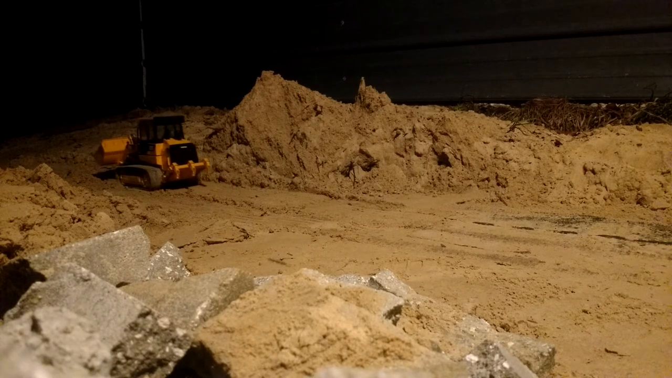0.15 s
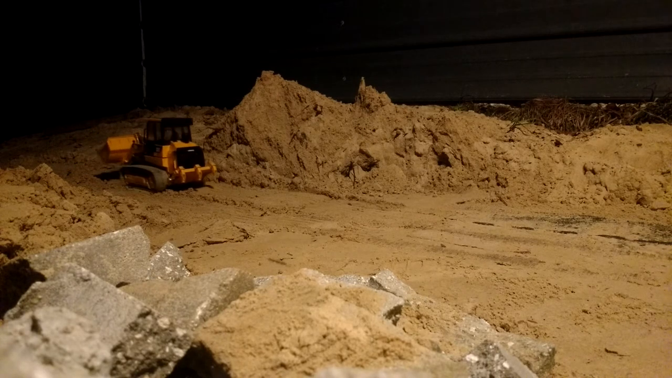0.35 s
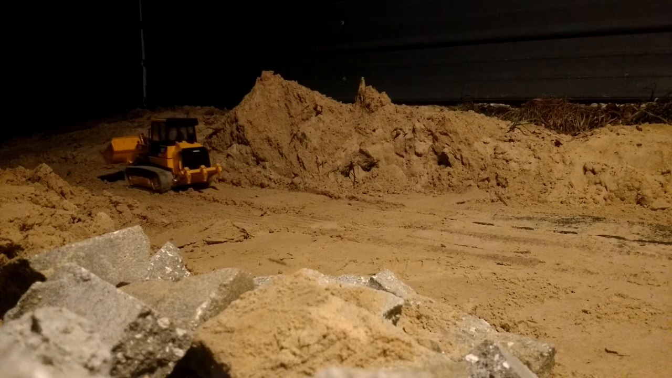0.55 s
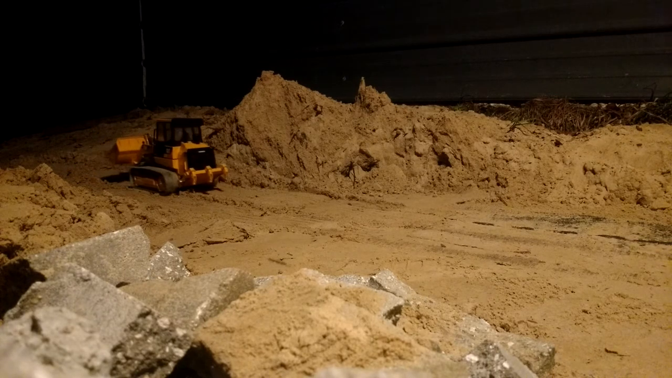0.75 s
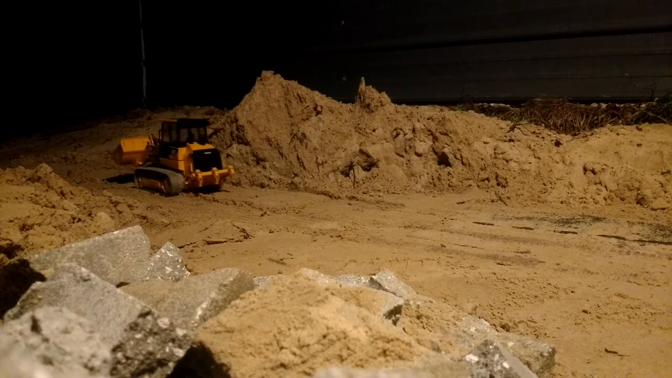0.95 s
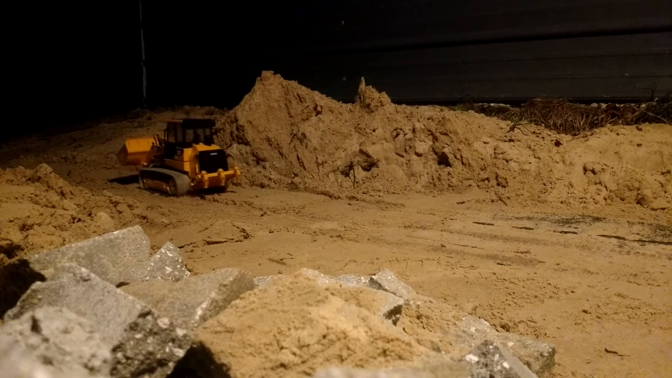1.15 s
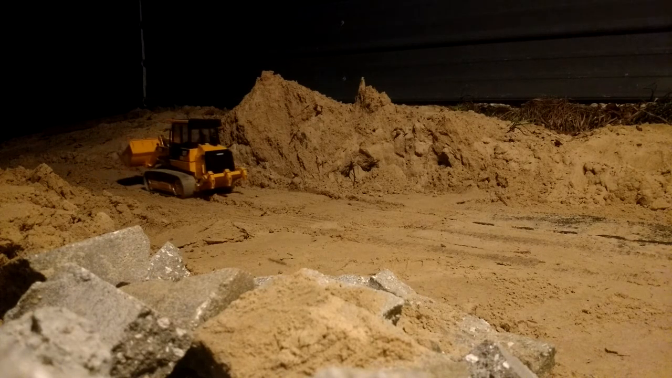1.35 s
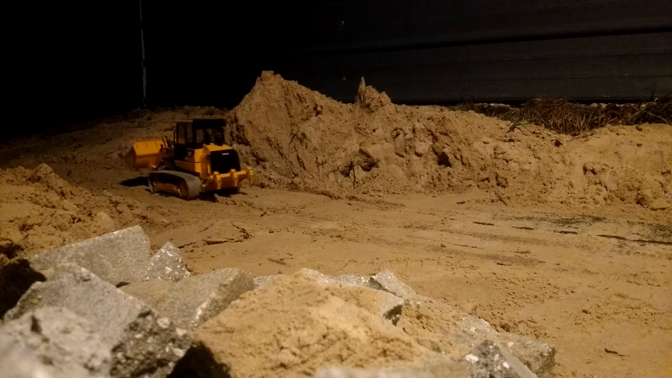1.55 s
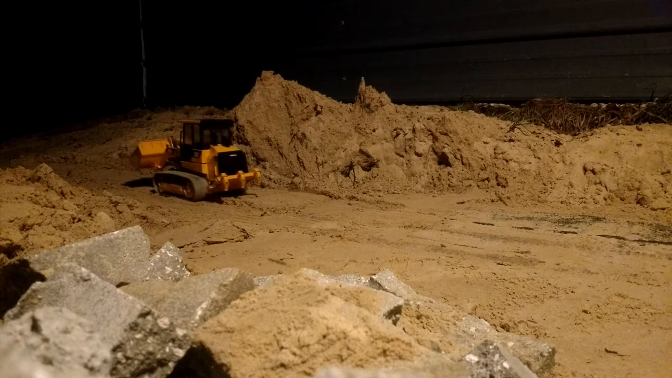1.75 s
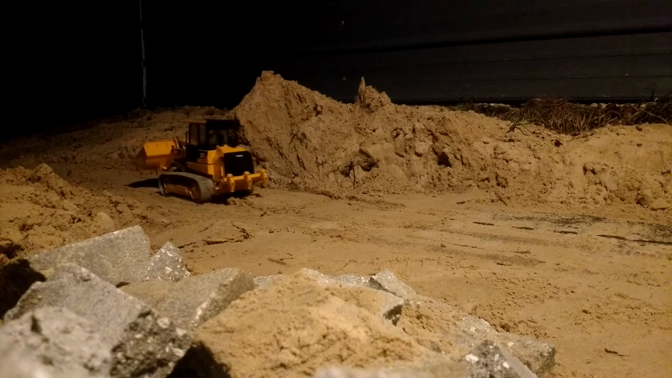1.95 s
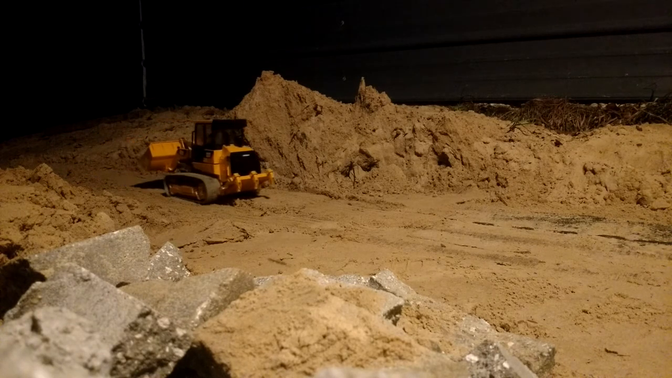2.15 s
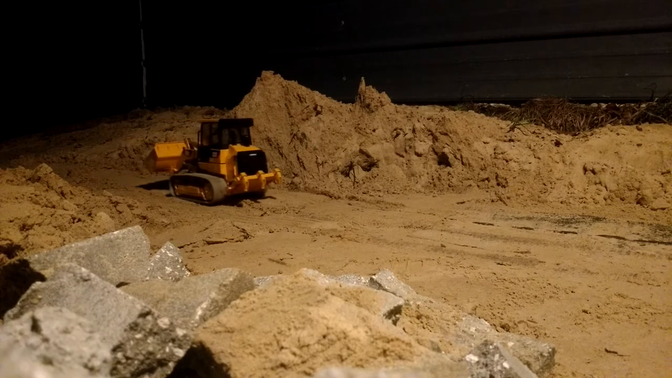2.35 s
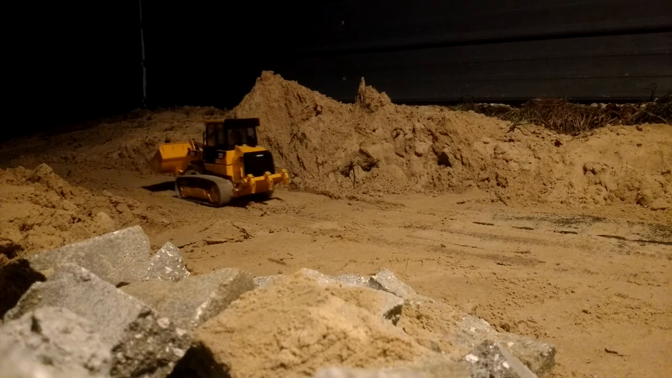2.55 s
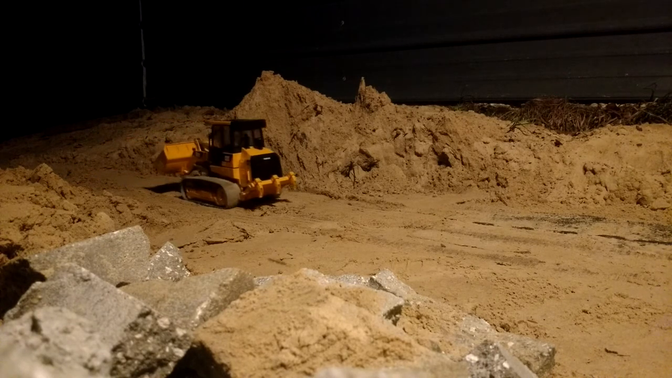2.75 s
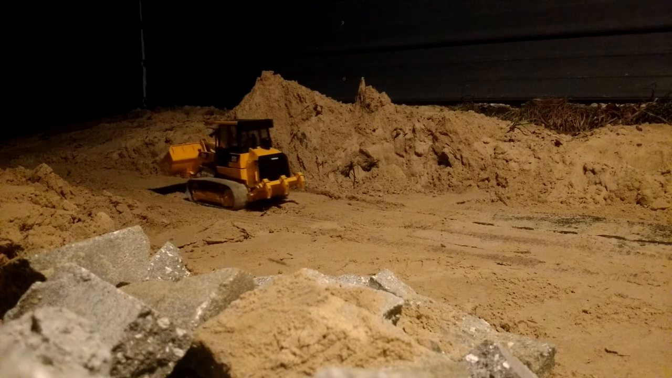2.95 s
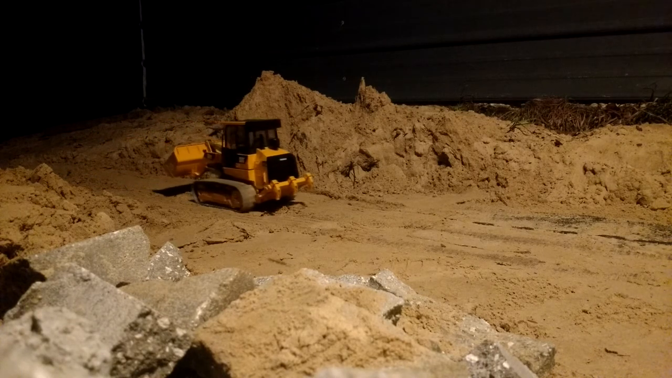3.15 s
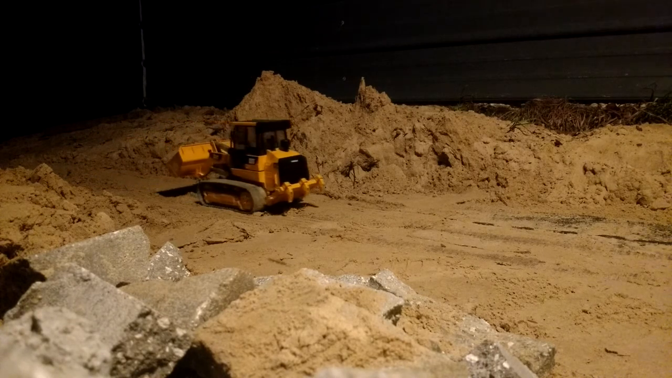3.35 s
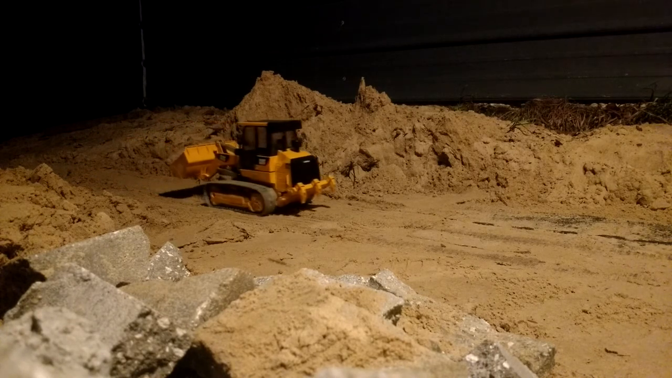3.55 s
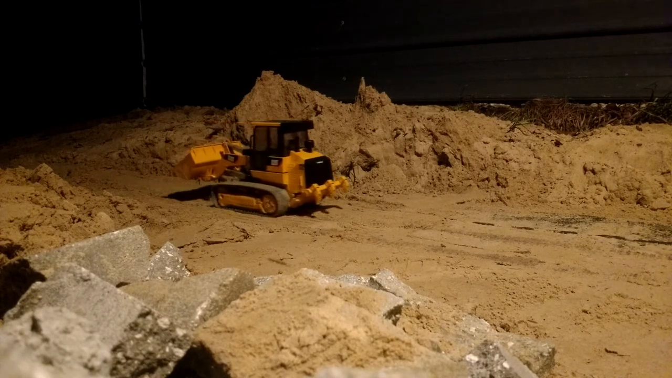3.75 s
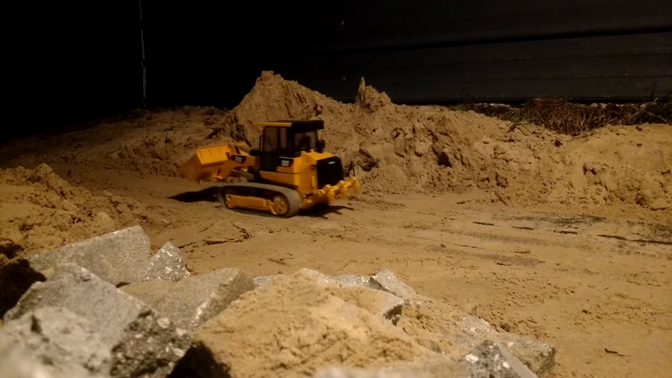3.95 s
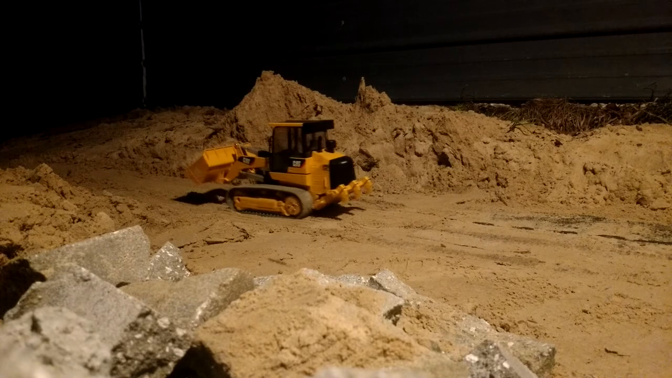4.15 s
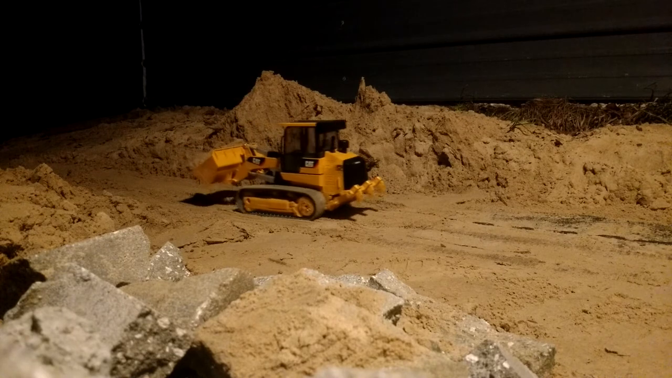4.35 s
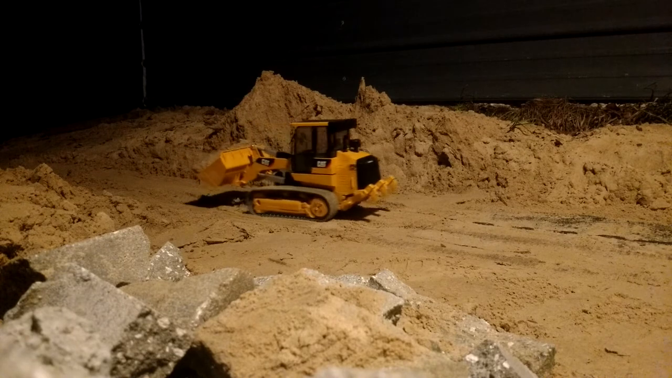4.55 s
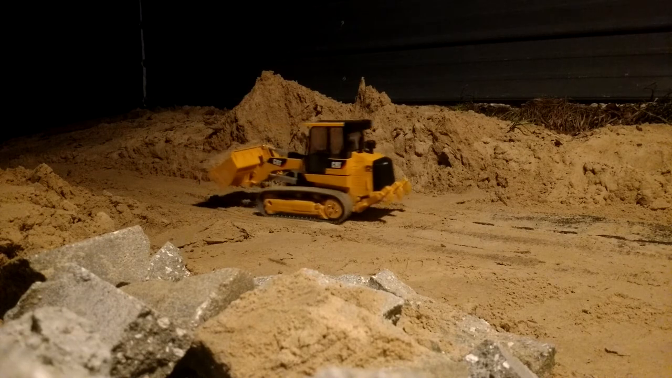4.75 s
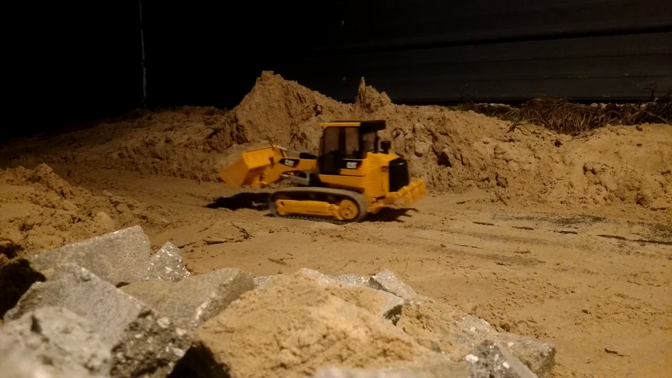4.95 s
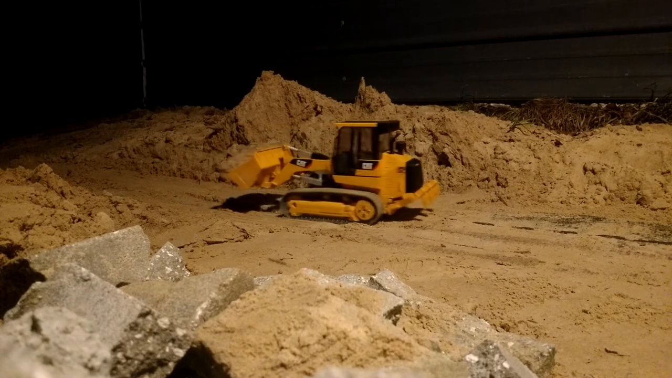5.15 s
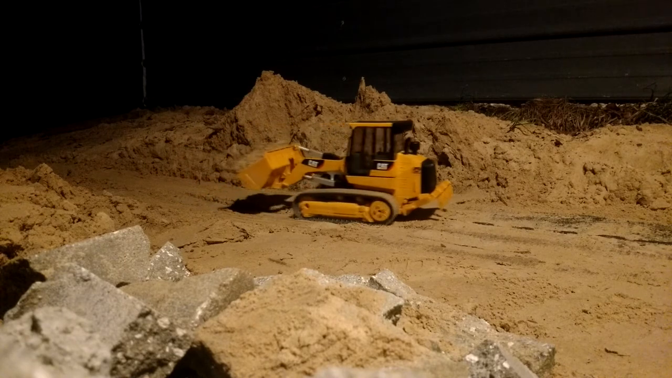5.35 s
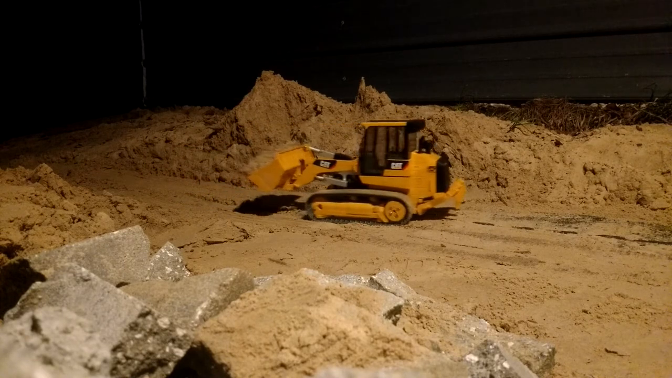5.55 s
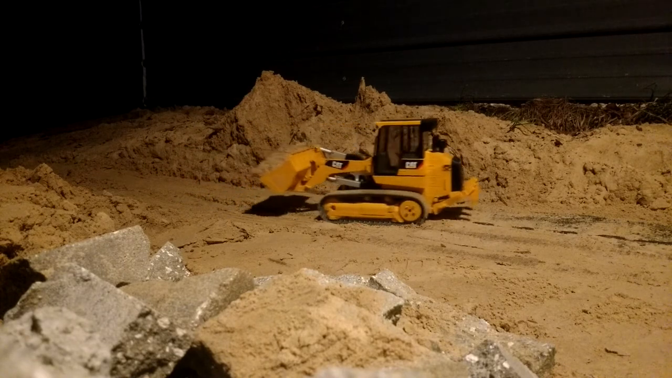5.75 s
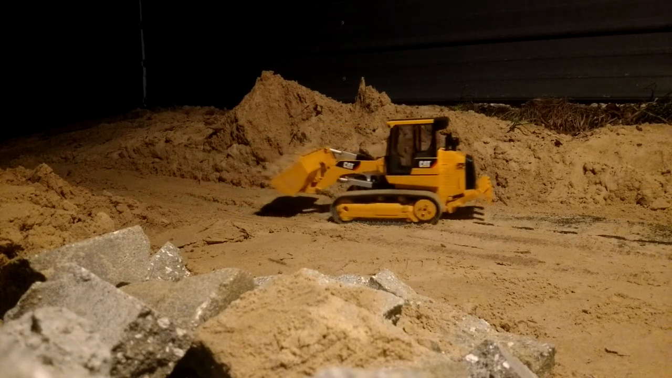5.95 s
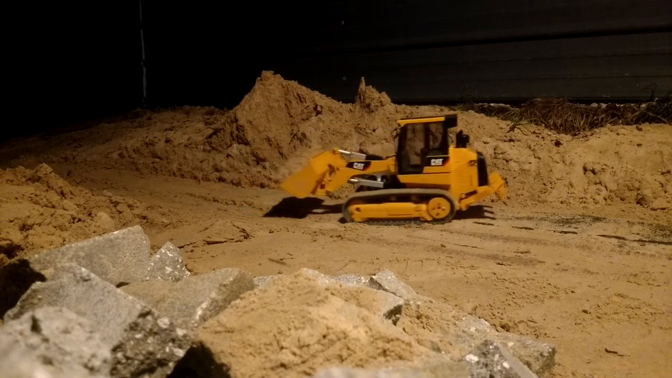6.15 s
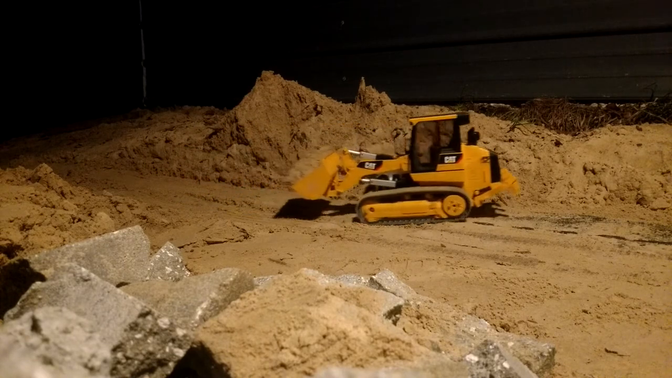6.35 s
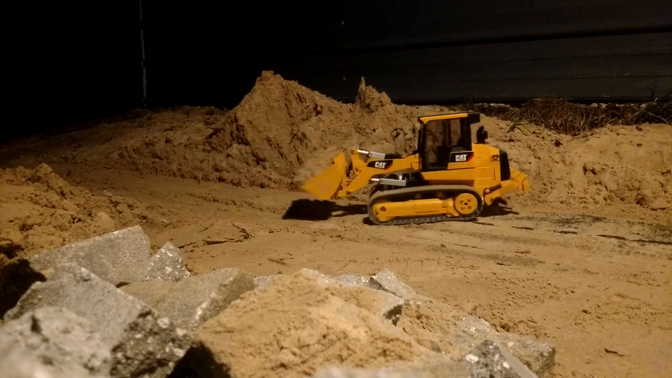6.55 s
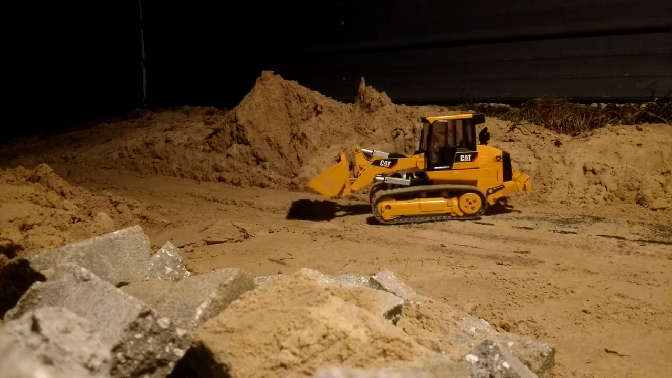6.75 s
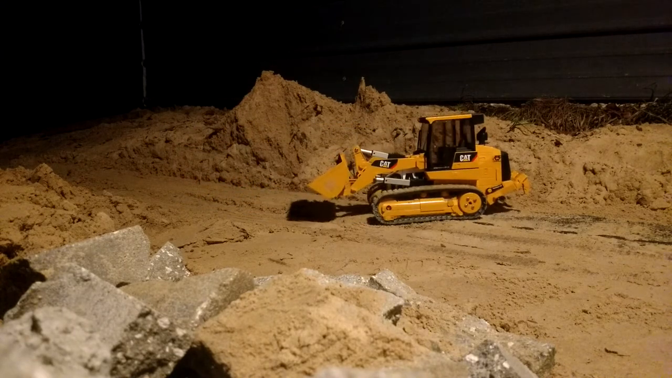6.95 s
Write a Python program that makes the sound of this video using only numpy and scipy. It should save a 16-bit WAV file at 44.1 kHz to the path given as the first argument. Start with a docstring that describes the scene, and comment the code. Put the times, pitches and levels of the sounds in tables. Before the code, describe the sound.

Quiet outdoor night air, with a low distant hum and faint raspy cricket chirps, sits behind a toy-sized tracked loader on sand. From 0 s its two electric drives are already running: high, buzzy, slightly detuned gear whines, each roughened and throbbing rapidly with shaft turns. Track links patter, sand crunches and the hollow hull rumbles, with brief swells between about 1.3 and 2.7 s and a bump near 4 s. It approaches from roughly three metres to under one and a half; tracks grow louder, the near gear brighter and raspier, with tight scraping around 3.5 to 5 s, while the far drive recedes. From 6.07 s light chassis knocks and loose rattles cluster. The whines fall in pitch and fade between 6.3 and 6.8 s, with sparse grit snaps. At 6.85 s the bucket settles with a short hollow, steely clank, leaving near silence and a faint chirp.

```python
"""Night air, a distant hum and a faint cricket lie behind a radio-controlled tracked loader on sand.
It backs in from the far left, about three metres from a microphone pair, and comes nearer and right.
Each track has its own motor: gears whine and rasp once a shaft turn, links patter and sand crunches.
After six seconds the drives run down; chassis and bucket knock, links rattle and grit snaps.
Whines are summed tooth-mesh harmonics, noises are coloured grains, knocks are decaying modes."""
import sys
import numpy as np
from scipy.fft import rfft, irfft, next_fast_len
from scipy.io import wavfile
from scipy.ndimage import uniform_filter1d, map_coordinates

SR = 44100
rng = np.random.default_rng(int(sys.argv[2]) if len(sys.argv) > 2 else 0)


def wav_record(signal):
    """Record a signal, one row per channel, as 16-bit PCM in the file named by sys.argv[1]."""
    frames = np.transpose(np.atleast_2d(signal))
    bounded = np.clip(frames, -1, 1)
    # unit amplitude maps onto the largest positive 16-bit level
    quanta = np.round(bounded * 32767).astype(np.int16)
    wavfile.write(sys.argv[1], SR, quanta)


N = 308700
TIME = np.arange(N) / SR

# teeth of the first gear and of the motor pinion; the two loudest mesh harmonics
TEETH, PINION = 50, 10
SECOND, THIRD = 2, 3
# each drive is throttled back, then runs down to rest: (time [s], run-down [s])
FAST_STOP, SLOW_STOP = (6.277, 0.322), (6.43, 0.4)

# where the loader stands: (time [s], place [0 far left to 1 near and right])
PLACE = [(0, 0.069), (2.3, 0.2), (4.2, 0.53), (5.7, 0.86)]
# links on sand, also the hull's broad resonances: (frequency [Hz], relative density [dB per Hz])
LINKS_ON_SAND = [(150, -18.5), (290, -17), (375, -5), (450, -12), (540, -4), (700, -7.5), (950, 1.5),
                 (1350, 0.5), (1700, -6.5), (2100, -7), (3000, -17), (6000, -19.5)]


def amp(db):
    """Decibels to gain."""
    return 10 ** (np.asarray(db) / 20)


def unit(x):
    """Scale to rms 1."""
    return x / np.sqrt(np.mean(x ** 2) + 1e-20)


def along(points, hz):
    """(Hz, value) points read on a log frequency axis."""
    f, v = np.transpose(points)
    return np.interp(np.log(hz + 1), np.log(f + 1), v)


def curves(rows):
    """One value per sample for each column after the time."""
    s, *cols = np.transpose(rows)
    return [np.interp(TIME, s, c) for c in cols]


def wobble(rate):
    """A smooth random curve at rms 1, rate knots a second."""
    knots = rng.standard_normal(int(TIME[-1] * rate) + 5)
    coarse = TIME[::10]
    curve = map_coordinates(knots, [coarse * rate], order=2, mode="mirror")
    return unit(np.interp(TIME, coarse, curve))


def filtered(x, response):
    """x times a response of frequency."""
    size = next_fast_len(N + 8192)
    return irfft(rfft(x, size) * response(np.fft.rfftfreq(size, 1 / SR)), size)[..., :N]


def coloured(x, spectrum):
    """x shaped by the given spectrum, at rms 1."""
    return unit(filtered(x, lambda hz: amp(along(spectrum, hz))))


def add(track, s, sound):
    """Mix a sound in at time s."""
    part = track[..., round(s * SR):][..., :sound.shape[-1]]
    part += sound[..., :part.shape[-1]]


def grains(rate, spread_db):
    """Two rows of tiny impacts at shared random times, rate a second, with scattered sizes."""
    hit = rng.random(N) < rate / SR
    size = amp(spread_db * np.clip(rng.standard_normal(N), -2, 2))
    return unit(hit * size * rng.standard_normal((2, N)))


def spread(pair):
    """Two unrelated signals become left and right, as alike as the microphone pair hears each pitch."""
    # (frequency [Hz], left-right likeness [-1 to 1])
    likeness = [(60, -0.85), (150, -0.079), (300, 0.36), (550, 0.95), (1300, 1), (1800, 0.95), (2150, 1),
                (2600, 0.62), (3200, 1), (4200, 1), (5000, 0.63), (6400, 1), (8000, 0.41), (11000, 0.45)]
    turn = lambda hz: np.arccos(np.clip(along(likeness, hz), -1, 1)) / 2
    mid, side = filtered(pair, lambda hz: np.array([np.cos(turn(hz)), np.sin(turn(hz))]))
    return np.array([mid + side, mid - side])


def nearness():
    """Level gained by coming closer, in dB over the starting point, by the inverse distance law."""
    # loader to microphone: (time [s], distance [m])
    distance = [(0, 3.2), (2.3, 2.28), (4.3, 1.6), (6.3, 1.414)]
    metres, = curves(distance)
    return 20 * np.log10(metres[0] / metres)


def side_on():
    """How far the loader has turned its side to the microphone, 0-1."""
    return np.clip(2.6 * curves(PLACE)[0], 0, 1)


def coast(stop):
    """Share of its speed that a drive keeps: it slows ever faster once throttled back."""
    off_s, run_down_s = stop
    curve = 2.45  # the higher, the later the speed falls away
    return np.clip(1 - (np.maximum(TIME - off_s, 0) / run_down_s) ** curve, 0, 1)


def rolling():
    """Share of its travelling speed that the whole machine keeps."""
    return (coast(FAST_STOP) + coast(SLOW_STOP)) / 2


def strain(part):
    """Rise in dB of one part as it comes under strain: each strain builds, holds and eases."""
    # gears, tracks, hull or grit: (part, middle [s], length [s], rise [dB before the part's own share])
    strains = [("slow third", 0.25, 0.46, 6.5), ("fast second", 0.099, 0.72, 6.6),
               ("fast second", 0.96, 1.3, 6.6), ("fast second", 2.05, 2, 8.4),
               ("slow second", 1, 0.89, 2.9), ("slow second", 1.72, 0.96, 4.4), ("hull", 1.363, 0.15, 4.4),
               ("hull", 1.67, .25, 4.8), ("hull", 1.92, 0.11, 8.1), ("fast third", 2.5, 0.15, 5.8),
               ("fast drone", 2.476, 0.77, 5.6), ("hull", 2.43, 0.42, 6), ("slow third", 2.76, 0.21, 5),
               ("hull", 2.68, 0.17, 9.8), ("tracks", 2.57, 0.69, 2.4), ("fast second", 2.92, 1.05, 6.8),
               ("slow third", 2.95, .4, 3.8), ("slow drone", 2.93, 0.47, 9.5),
               ("slow drone", 3.464, 0.81, 8.4), ("fast drone", 0.98, 0.65, 4.9),
               ("fast drone", 2.0, 0.46, 5), ("fast second", 3.614, 0.56, 5.16),
               ("fast second", 4.38, 1, 3.1), ("hull", 3.94, 0.17, 10.8), ("bind", 4.14, 0.56, 5),
               ("slow drone", 4.464, 1.33, 16), ("fast third", 4.66, 0.19, 6.6),
               ("bind", 3.565, 0.36, 2.37), ("fast drone", 4.87, 0.29, 7.3),
               ("fast third", 5.23, 0.27, 8.4), ("grit", 5.9, 0.18, 5), ("grit", 6.095, 0.65, 3.05),
               ("bind", 5.1, 0.26, 3.9), ("fast second", 6.015, 0.96, 10.3),
               ("fast overtones", 6.53, 0.23, 2.7), ("grit", 6.34, 0.27, 5.1), ("fast third", 6.3, 0.12, 5),
               ("fast third", 6.415, 0.18, 14), ("fast overtones", 5.92, 0.95, 2.16),
               ("slow third", 6.58, 0.16, 5), ("slow third", 3.796, 1.0, 3.2),
               ("slow third", 1.51, 1.6, 2.3)]
    rise_share = 0.36  # of the length, spent building and again easing
    return sum(db * np.clip((0.5 - abs(TIME - s) / length) / rise_share, 0, 1)
               for name, s, length, db in strains if name == part)


def turn_rate(angle):
    """Turns a second of a shaft."""
    return np.abs(np.gradient(angle)) * SR / (2 * np.pi)


def per_turn(angle, count):
    """Tooth errors: a random pattern of count points that returns each turn and changes only slowly."""
    turns = angle / (2 * np.pi)
    pattern = rng.standard_normal((400, count))
    pattern = uniform_filter1d(pattern, size=14, axis=0, mode="wrap").ravel()
    return unit(np.interp(turns * count, np.arange(pattern.size), pattern))


def night(air_db, hum_db, hum_waver):
    """Outdoor air as coloured noise, and the unsteady hum of distant machinery as wavering tones."""
    # air: (frequency [Hz], relative density [dB per Hz])
    air_spectrum = [(25, -42), (40, -32), (56, 1), (78, -8), (100, -2.5), (160, 4.5), (210, -3),
                    (280, -2.5), (420, -11.5), (570, -11.5), (800, -10.5), (1250, -4), (2000, -19.5),
                    (14000, -29)]
    # distant machinery: (frequency [Hz], relative level [dB])
    hum_tones = [(93, -63), (119, -60), (166, -57), (236, -61.5), (275, -61)]
    air = amp(air_db) * coloured(rng.standard_normal((2, N)), air_spectrum)

    def tone(hz):
        """One hum note, wavering in level and phase."""
        return unit((1 + hum_waver * wobble(14)) * np.sin(2 * np.pi * hz * TIME + 1.6 * wobble(9)))
    # each microphone hears its own wavering
    hum = [sum(amp(db + hum_db) * tone(hz) for hz, db in hum_tones) for port in range(2)]
    return air + np.array(hum)


def cricket(chirp_hz, chirp_db):
    """Faint raspy chirps on one wavering note."""
    # (time [s], length [s], relative level [dB])
    chirps = [(0.346, 0.22, -51), (1.79, 0.2, -52), (2.548, 0.2, -48), (3.8, 0.231, -48),
              (4.957, 0.22, -46), (6.754, 0.195, -47)]
    gate = lambda s, length: np.clip(np.minimum(TIME - s, s + length - TIME) / 0.016, 0, 1)
    level = sum(amp(db + chirp_db) * gate(s, length) for s, length, db in chirps)
    note = np.sin(2 * np.pi * chirp_hz * TIME + 1.04 * wobble(260))
    return level * unit(amp(3.1 * wobble(110)) * note)


def knocks(knock_db, rattle_db, click_db, tick_db):
    """Bucket and chassis jolts ring decaying modes, click and rattle loose links; sand grit snaps."""
    # bucket and chassis: (time [s], relative level [dB], bright click re the knock [dB, before click_db])
    contacts = [(6.073, -25.5, -19), (6.0792, -26, -19), (6.089, -30, -7), (6.097, -28, -15),
                (6.111, -25, -12), (6.127, -34, -12), (6.134, -27, -14), (6.146, -30, -14),
                (6.233, -23.5, -24), (6.252, -24.5, -17), (6.2905, -22, -8), (6.298, -20.5, -15),
                (6.308, -26.5, -15), (6.317, -28, -15), (6.327, -25, -18), (6.344, -22.5, -16),
                (6.369, -28, -18), (6.381, -25, -19), (6.385, -26.5, -16), (6.494, -22.5, -19),
                (6.552, -28, -8), (6.8536, -23, -11.5), (6.8565, -24.5, -13.5), (6.8594, -34, -16),
                (6.989, -32.5, -32)]
    # chassis modes: (nominal frequency [Hz], relative level [dB], t60 [s])
    chassis = [(273.7, -10.5, 0.048), (373, -9, 0.026), (546, -7, 0.05), (721, -6, 0.036),
               (940, -0.5, 0.025), (1167, -2.5, 0.024), (1325, -3.5, 0.024), (1537, -7, 0.022),
               (1719, -9.5, 0.02), (2580, -16, 0.015), (3010, -20, 0.022)]
    # grit snaps under the tracks: (time [s], relative level [dB])
    grit_snaps = [(1.067, -34.5), (1.0913, -35), (4.5405, -35), (4.994, -37), (5.3444, -33), (6.51, -40),
                  (6.686, -51), (6.71, -46), (6.9331, -49), (6.9742, -42)]
    rattle_t60_s = 0.051  # loose links rattle on after each knock
    body, shaken, clicks = np.zeros(N), np.zeros(N), np.zeros((2, N))
    t = np.arange(SR // 8) / SR
    hz, mode_db, t60 = np.transpose(chassis)[:, :, None]
    for s, db, bright_db in contacts:
        # each contact loads the chassis a little differently
        strength, start, detune = rng.standard_normal((3, len(hz), 1))
        decay = amp(mode_db + 1.4 * strength - 60 * t / t60)
        ring = (decay * np.sin(2 * np.pi * (hz * (1 + 0.048 * detune) * t + start))).sum(0)
        add(body, s, amp(db + knock_db) * ring * (1 - np.exp(-t / 0.0012)))
        # the rattles add up as energy
        add(shaken, s, amp(db + rattle_db - 60 * t / rattle_t60_s) ** 2 * (1 - np.exp(-t / 0.0024)))
        add(clicks, s, amp(db + bright_db + click_db - 60 * t / 0.03) * rng.standard_normal((2, len(t))))
    for s, db in grit_snaps:
        add(clicks, s, amp(db + tick_db - 60 * t / 0.013) * rng.standard_normal((2, len(t))))
    rattle = np.sqrt(shaken) * coloured(rng.standard_normal(N), LINKS_ON_SAND)
    bright = coloured(clicks, [(500, -15), (2500, -13), (6000, 3.0), (15000, -2.5)]) * clicks.std()
    return body + rattle + spread(bright)


def bucket():
    """The bucket settles right of centre: a hollow note and a short steel clank decay together."""
    # (frequency [Hz], relative level [dB], t60 [s])
    modes = [(550, -28, 0.083), (700, -27.5, .025), (2680, -25, 0.011), (3050, -30, 0.0099)]
    settles_s, balance_db = 6.854, -4  # balance is left minus right
    t = np.maximum(TIME - settles_s, 0)
    ring = sum(amp(db - 60 * t / t60) * np.sin(2 * np.pi * hz * t) for hz, db, t60 in modes)
    return ring * (1 - np.exp(-t / 0.0011)) * amp(np.array([[1], [-1]]) * balance_db / 2)


def hull_boom(boom_db, uneven_db):
    """The hollow hull rumbles as coloured noise, most when a track rides over a lump."""
    # (frequency [Hz], relative density [dB per Hz])
    boom_spectrum = [(200, -17), (310, -20), (380, -2), (450, -8.5), (540, -0.5), (660, -5.5), (900, -23.5)]
    level = amp(boom_db + strain("hull") + uneven_db * wobble(12))
    return coloured(rng.standard_normal((2, N)), boom_spectrum) * level * rolling()


def tracks(smooth, patter_db, grows, uneven_db):
    """Links slap the rollers and crush sand: dense little impacts in the hull's broad resonances."""
    level = patter_db + grows * nearness() + strain("tracks")
    level = level + uneven_db * wobble(4.92) + 1.0 * wobble(28)
    impacts = grains(rate=900, spread_db=-1.0) + smooth * rng.standard_normal((2, N))
    return coloured(impacts, LINKS_ON_SAND) * amp(level) * rolling() ** 0.94


def rasp(angle, throb, rotor_depth, gritty, rasp_db, grit_db, grows):
    """Sliding teeth hiss, swelling with each turn of the shaft; sand grains snap above them."""
    # (frequency [Hz], relative density from behind [dB per Hz], from the side [dB per Hz])
    rasp_spectra = [(1850, -35, -18), (2330, -4, -3), (3030, -7.5, -2), (3840, -33, -3.5), (3800, -35, -11),
                    (4670, -27, -1), (5500, 5.5, -2.5), (6720, 2.5, 0.5), (8300, -8, -9.5), (9100, 8, -6),
                    (11240, -14, -11.5), (12700, -8, -11), (14300, 0, -8), (15500, -13, -15)]
    grit_spectrum = [(5000, -18), (9000, -8.5), (13000, 6.0), (15500, -1.0)]
    scrape = rng.standard_normal((2, N)) + gritty * grains(rate=1500, spread_db=-0.5)
    pressure = np.exp(throb * np.cos(angle) + rotor_depth * np.cos(TEETH / PINION * angle))
    behind, beside = [coloured(scrape * pressure, [(900, -25)] + [(row[0], row[k]) for row in rasp_spectra])
                      for k in (1, 2)]
    hiss = amp(rasp_db + 0.66 * wobble(14)) * ((1 - side_on()) * behind + side_on() * beside)
    grit_level = amp(grit_db + strain("grit") + 0.27 * nearness() + 1.5 * wobble(10))
    grit = grit_level * coloured(grains(rate=550, spread_db=2.0), grit_spectrum)
    return (hiss + grit) * amp(grows * nearness()) * rolling() ** 2.6


def binding(angle, bind_db, hidden_db, sharp, loose):
    """A tight spot in the fast gear scrapes much alike each turn, muffled until the loader is side-on."""
    # a binding tooth rings the gearbox: (frequency [Hz], relative density [dB per Hz])
    bind_spectrum = [(2200, -29), (2700, -21.5), (3100, -6.5), (3600, -18), (4400, -18), (4780, -15),
                     (5080, -4), (5400, -6), (5780, -2), (6200, -12), (8000, -24)]
    scrape = np.array([per_turn(angle, count=800) for port in range(2)])
    scrape = scrape + loose * rng.standard_normal((2, N))
    bursts = np.exp(sharp * (np.cos(angle) - 1)) * scrape
    level = amp(bind_db + strain("bind") - hidden_db * (1 - side_on()))
    return coloured(bursts, bind_spectrum) * level * coast(FAST_STOP) ** 8


def low_gears(fast, slow, blur, slow_db, fast_db, whirr_db, whirr_shade_db, lowest_db, highest_db,
              grows, drift_db):
    """Slow gear stages drone in the hull at fixed multiples of shaft speed; one whirrs to the rear."""
    def stage(angle, teeth):
        """One blurred drone at a multiple of the shaft's turns, through the hull's resonances."""
        hull = amp(along(LINKS_ON_SAND, teeth * turn_rate(angle)) + drift_db * wobble(4.3))
        return hull * unit(np.sin(teeth * angle + blur * wobble(80)))
    upper = amp(slow_db + strain("slow drone")) * stage(slow, 23)
    upper = upper + amp(fast_db + strain("fast drone")) * stage(fast, 15)
    # the rear whirr fades as the loader moves to the right
    whirr = amp(whirr_db - whirr_shade_db * curves(PLACE)[0]) * stage(fast, 21.3)
    lowest = stage(slow, 13) + stage(fast, 8)
    highest = stage(slow, 29) + stage(fast, 30)
    drones = upper + whirr + amp(lowest_db) * lowest + amp(highest_db) * highest
    return drones * amp(grows * nearness()) * coast(FAST_STOP)


def shaft_angle(speed, stop, flutter, ripple, link_hz, wander):
    """Gear shaft angle [rad]; uneven sand and each track link on the sprocket tug at its speed."""
    ground_smooths = 0.647  # share of the tugging that is gone on the flat sand at place 1
    mesh_hz = curves(speed)[0] * coast(stop)
    links = np.sin(2 * np.pi * np.cumsum(link_hz * (1 + 0.1533 * wobble(4))) / SR)
    tug = ripple * links + flutter * wobble(45) + wander * wobble(8)
    tug = tug * (1 - ground_smooths * curves(PLACE)[0])
    return 2 * np.pi * np.cumsum(mesh_hz * (1 + tug)) / TEETH / SR


def whine(angle, drive, second_db, third_db, throb, upper_throb, sway, slop, wear, rough_db, drift_db,
          rotor_depth):
    """Mesh harmonics of a worn, off-centre gear that binds briefly and changes speed once a turn."""
    # the gearbox housing favours some pitches: (frequency [Hz], gain [dB])
    housing_gain = [(3800, -11), (4200, -2), (4650, -1), (5050, 0), (5350, -3), (5900, 1.5), (6500, 1.5),
                    (7000, -2.5), (7500, -1.5), (8000, 0.5)]
    mesh_hz = TEETH * turn_rate(angle)
    mesh = TEETH * angle + sway * np.sin(angle) + slop * wobble(420) + wear * per_turn(angle, count=10)
    rotor = 1 + rotor_depth * np.cos(TEETH / PINION * angle)
    bind = np.exp(1.9 * (np.cos(angle) - 1))

    def line(k, depth):
        """One roughened mesh harmonic, throbbing with the bind and heard through the housing."""
        housing = amp(along(housing_gain, k * mesh_hz) + drift_db * wobble(7.1))
        rough = amp(rough_db * wobble(130))
        return housing * unit(rough * (1 + depth * bind) * rotor * np.sin(k * mesh))
    second = amp(second_db + strain(drive + " second")) * line(SECOND, throb)
    third = amp(third_db + strain(drive + " third")) * line(THIRD, upper_throb)
    return second + third


def overtones(angle, column, level, tilt_db, blur, wear, throb, rough_db):
    """Uneven teeth blur the other mesh harmonics into narrow singing bands; tilt is in dB per multiple."""
    # (multiple of the mesh, relative level in the fast drive [dB], in the slow drive [dB])
    weaker_harmonics = [(1, 0.5, 0.5), (4, -4, 1), (5, -6, -16), (6, -3.5, -12)]

    def band(k):
        """One harmonic with its own tooth errors and roughness."""
        error = blur * wobble(450) + wear * per_turn(angle, count=12)
        sine = np.sin(round(k) * TEETH * angle + np.sqrt(k) * error)
        return unit(amp(rough_db * wobble(90)) * sine)
    lines = sum(amp(row[column] + tilt_db * (row[0] - THIRD)) * band(row[0]) for row in weaker_harmonics)
    return amp(level) * unit(np.exp(throb * np.cos(angle))) * lines


def slow_drive(angle, second_db, third_db, overtone_db, second_shade_db, third_shade_db, overtone_shade_db):
    """The far drive is shaded by the hull as the loader turns side-on."""
    place, = curves(PLACE)
    gears = whine(angle, "slow", second_db - second_shade_db * place, third_db - third_shade_db * place,
                  throb=0.29, upper_throb=0.78, sway=0.11, slop=0.21, wear=0.21, rough_db=4,
                  drift_db=-0.2, rotor_depth=0.097)
    level = overtone_db - overtone_shade_db * place + 0.5 * strain("slow second")
    gears += overtones(angle, 2, level, tilt_db=0.0, blur=0.38, wear=0.23, throb=0.25, rough_db=5.0)
    return gears * coast(SLOW_STOP) ** 8


def fast_drive(angle, second_db, third_db, overtone_db, second_grows, third_grows, overtone_grows,
               throb_per_db, bright_per_db):
    """The near drive grows louder and brighter, and its throb plainer, as the loader approaches."""
    near = nearness()
    gears = whine(angle, "fast", second_db + second_grows * near, third_db + third_grows * near,
                  throb=0.5 + throb_per_db * near, upper_throb=0.1, sway=0.083, slop=0.13, wear=0.23,
                  rough_db=2.5, drift_db=1.0, rotor_depth=0.19)
    level = overtone_db + overtone_grows * near + strain("fast overtones")
    gears += overtones(angle, 1, level, bright_per_db * near, blur=0.47, wear=0.48, throb=0.16, rough_db=4.0)
    return gears * coast(FAST_STOP)


def scene():
    """The surroundings, the tracks and both drives, before the microphones' colouring."""
    # each drive under power, before tugging and run-down: (time [s], tooth mesh frequency [Hz])
    fast_speed = [(0.0, 2350), (0.27, 2368), (0.31, 2297), (0.37, 2336), (0.47, 2247), (0.57, 2378),
                  (0.66, 2333), (1.0, 2351), (1.48, 2344), (1.57, 2267), (1.84, 2396), (2.1, 2290),
                  (2.17, 2320), (2.27, 2224), (2.4, 2278), (2.48, 2408), (2.56, 2413), (2.62, 2330),
                  (2.76, 2290), (2.82, 2370), (2.87, 2265), (3.01, 2346), (3.11, 2333), (3.18, 2439),
                  (3.64, 2500), (3.76, 2465), (3.91, 2464), (3.97, 2547), (4.12, 2555), (4.42, 2440),
                  (4.5, 2472), (4.55, 2429), (4.69, 2520), (4.84, 2674), (4.95, 2550), (5.07, 2562),
                  (5.39, 2409), (5.58, 2560), (5.82, 2493), (6.14, 2535), (6.18, 2410), (6.23, 2403),
                  (6.28, 2462)]
    slow_speed = [(0, 2180), (.1, 2126), (.21, 2050), (.33, 2110), (.37, 2220), (.5, 2273), (1, 2309),
                  (2.38, 2224), (2.48, 2100), (2.75, 2170), (2.88, 2105), (3.08, 2070), (3.25, 1965),
                  (3.75, 1850), (4.1, 1939), (4.55, 2036), (4.72, 1998), (5.3, 1889), (5.95, 1957),
                  (6.27, 2050), (6.48, 2070)]
    fast = shaft_angle(fast_speed, FAST_STOP, flutter=0.0042, ripple=0.006, link_hz=11, wander=0.001)
    slow = shaft_angle(slow_speed, SLOW_STOP, flutter=0.00402, ripple=0.00715, link_hz=10, wander=0.002)
    noises = night(air_db=-47.5, hum_db=0.5, hum_waver=0.45)
    noises += hull_boom(boom_db=-55.5, uneven_db=1.0)
    noises += tracks(smooth=1.0, patter_db=-52.5, grows=1.68, uneven_db=0.8)
    noises += rasp(fast, throb=0.093, rotor_depth=0.092, gritty=0.4, rasp_db=-47.0, grit_db=-57.0, grows=0.69)
    noises += binding(fast, bind_db=-48.5, hidden_db=20.5, sharp=1.2, loose=0.4)
    hits = knocks(knock_db=-2, rattle_db=-8.5, click_db=-1.5, tick_db=5.0) + bucket()
    gears = low_gears(fast, slow, blur=0.33, slow_db=-64, fast_db=-55, whirr_db=-57.0, whirr_shade_db=15.5,
                      lowest_db=-62.0, highest_db=-62, grows=0.05, drift_db=0.0)
    gears += slow_drive(slow, second_db=-44.5, third_db=-48.0, overtone_db=-54.0,
                        second_shade_db=10, third_shade_db=2.5, overtone_shade_db=12.0)
    gears += fast_drive(fast, second_db=-48.0, third_db=-48.0, overtone_db=-55.0, second_grows=0.046,
                        third_grows=0.05, overtone_grows=0.43, throb_per_db=0.37, bright_per_db=0.3574)
    return gears + cricket(chirp_hz=3744, chirp_db=-7.5) + hits + spread(noises)


def record(dry):
    """The microphone pair colours each side by the loader's direction and has a band limit."""
    # (frequency [Hz], L-R with the loader far left [dB], L-R with it near and right [dB])
    balance = [(200, 0.5, -1), (382, 4.5, -1.5), (570, -4.5, -6.5), (920, 1, -2.5), (1360, -2.5, 3.5),
               (1690, -9.5, 10), (2290, 2.5, -6), (2700, 10, -5.5), (3340, -3.5, 1.5), (4440, 0.5, -0.5),
               (5130, 5.5, -5), (6350, -3, -0.5), (7500, -4.5, -0.5), (9700, -3, -7), (13100, 2, -5.5),
               (15500, -1, -1)]
    # (frequency [Hz], left's lead with the loader far left [rad], with it near and right [rad])
    port_phase = [(1500, 0, 0), (1850, -2, -1.5), (2070, -3, -2.5), (2220, -3, -3), (2730, -7, -6),
                  (3510, -5, -5), (3915, -9, -9), (4400, -9.5, -9.5), (4676, -10, -10.5), (4835, -10, -11),
                  (5300, -13, -12), (6340, -15.5, -15.5), (6720, -15, -15.5), (7094, -18.5, -18),
                  (7560, -18.5, -18), (7760, -19.5, -19.5), (8460, -22.5, -22), (9300, -23.5, -23.5)]
    top_hz = 15850
    sides = np.array([[1], [-1]]) / 2
    place = np.clip(curves(PLACE)[0], 0, 1)

    def ports(column):
        """What the pair picks up from one direction."""
        read = lambda table, hz: along([(row[0], row[column]) for row in table], hz)
        gain = lambda hz: amp(sides * read(balance, hz))
        lead = lambda hz: np.exp(1j * sides * read(port_phase, hz))
        return filtered(dry, lambda hz: gain(hz) * lead(hz))
    return filtered((1 - place) * ports(1) + place * ports(2), lambda hz: hz < top_hz)


dry = scene()
out = record(dry)
wav_record(out)
```